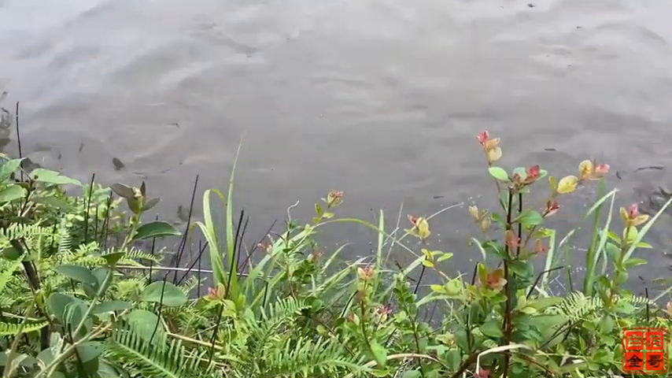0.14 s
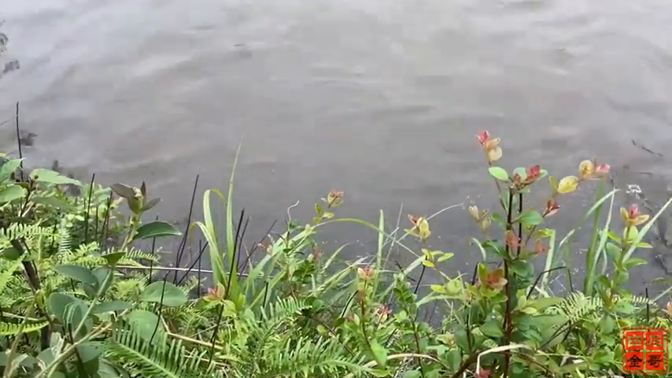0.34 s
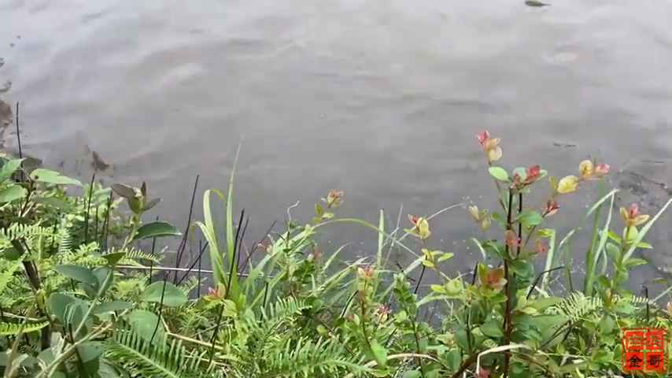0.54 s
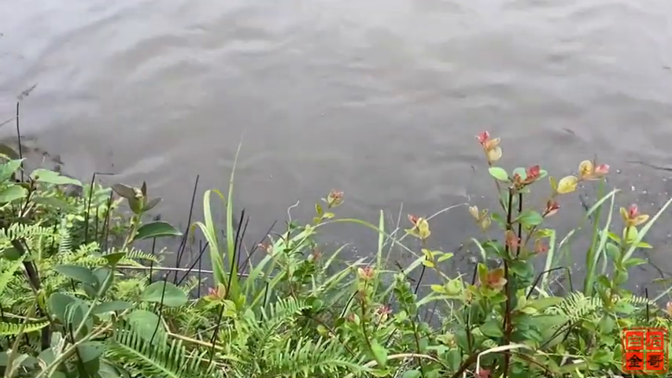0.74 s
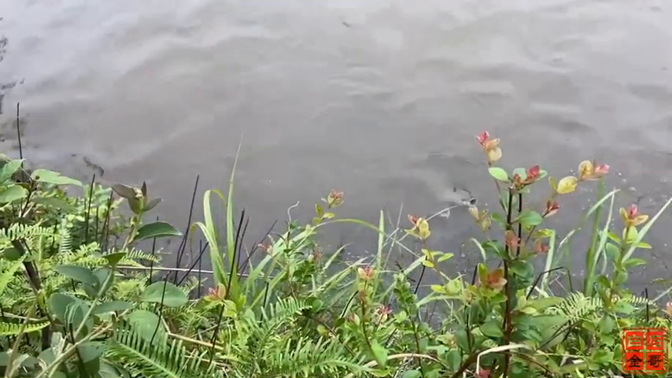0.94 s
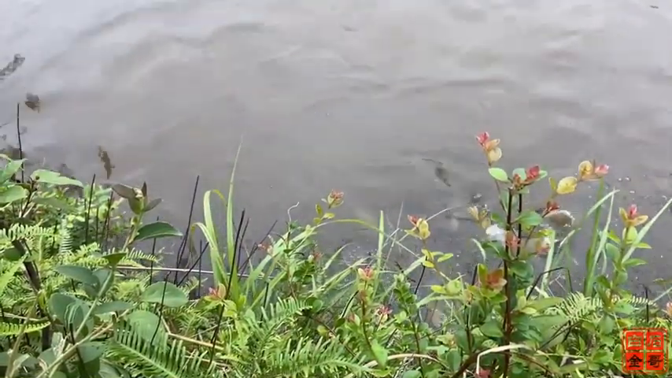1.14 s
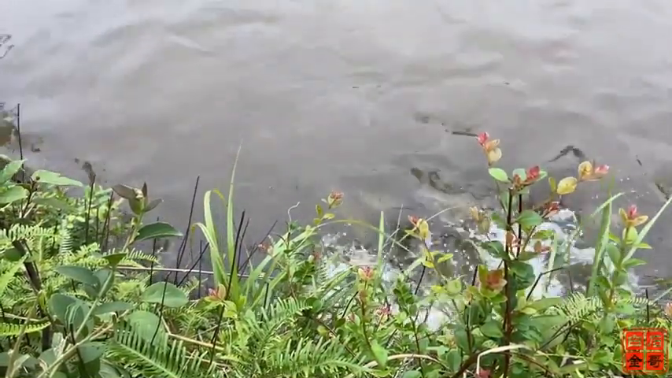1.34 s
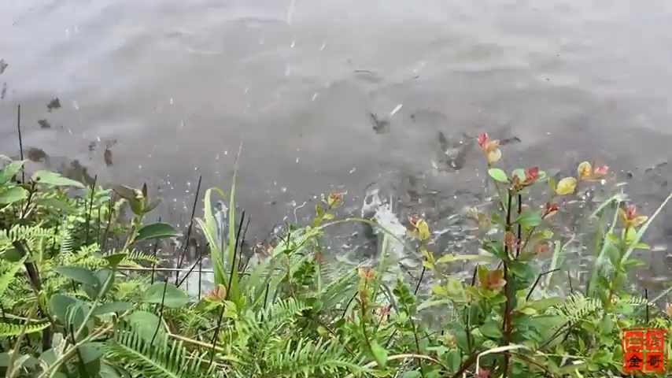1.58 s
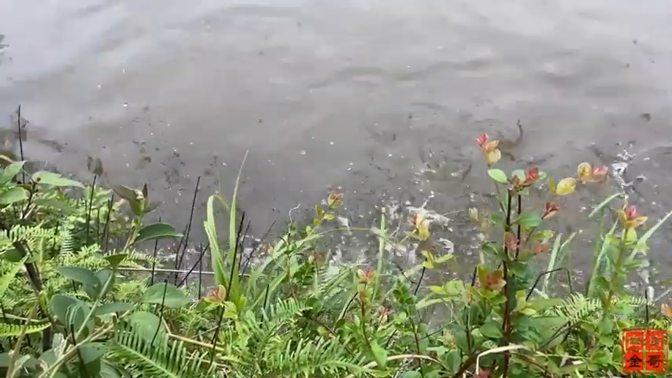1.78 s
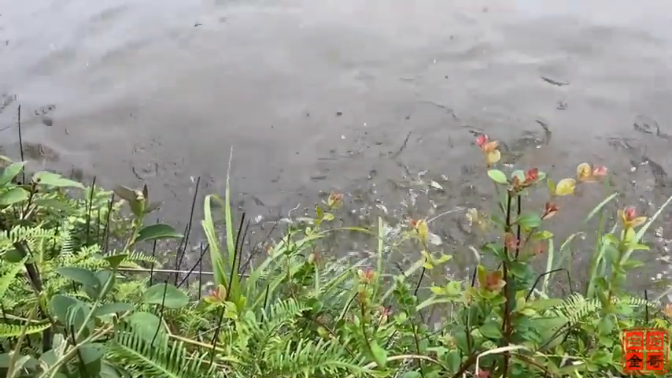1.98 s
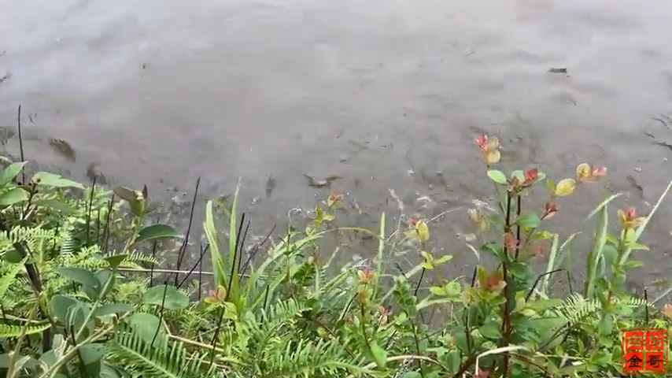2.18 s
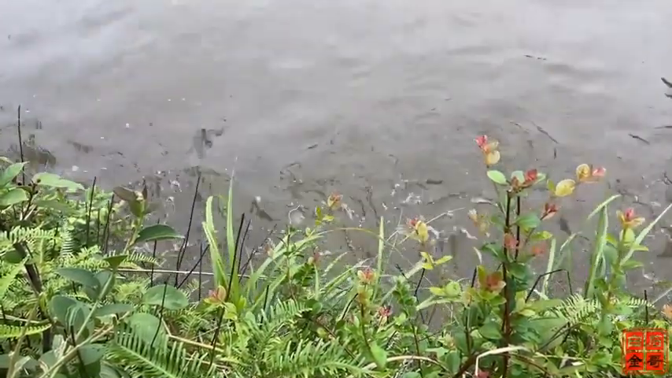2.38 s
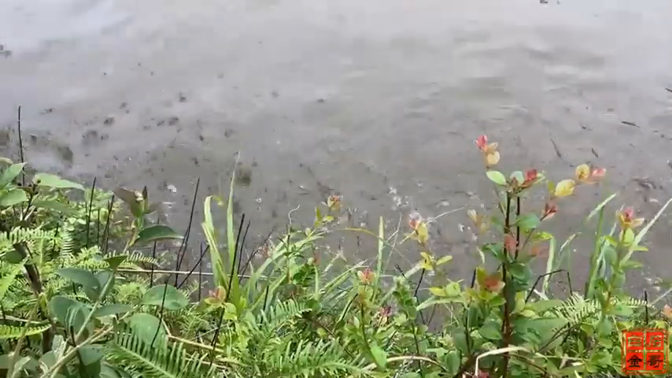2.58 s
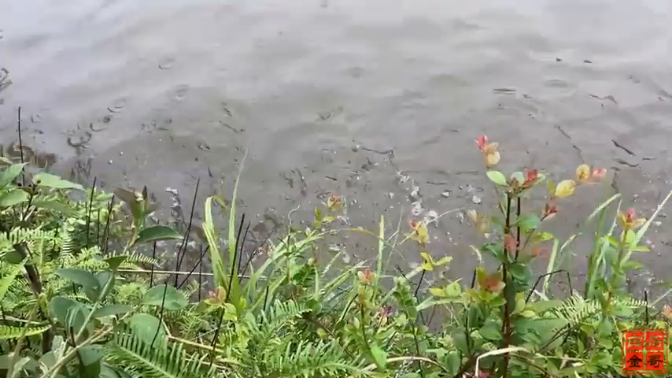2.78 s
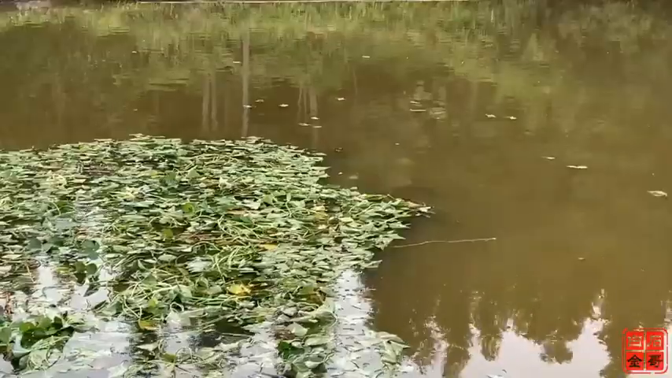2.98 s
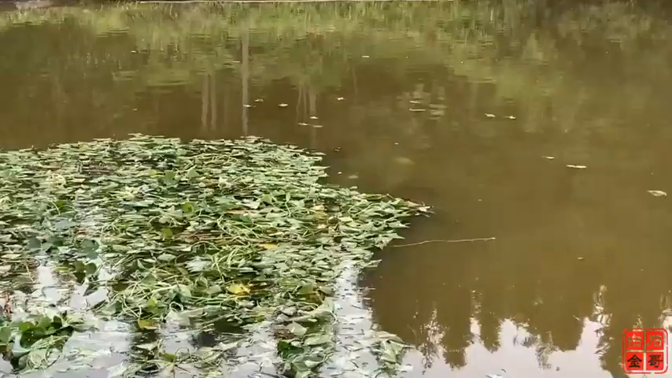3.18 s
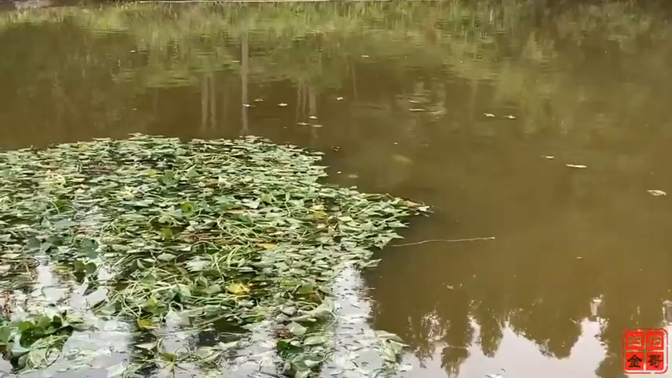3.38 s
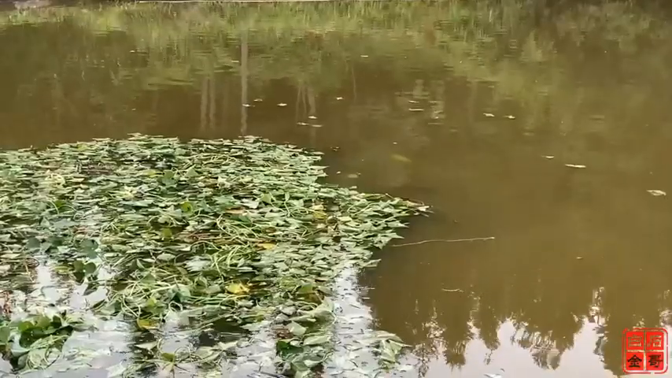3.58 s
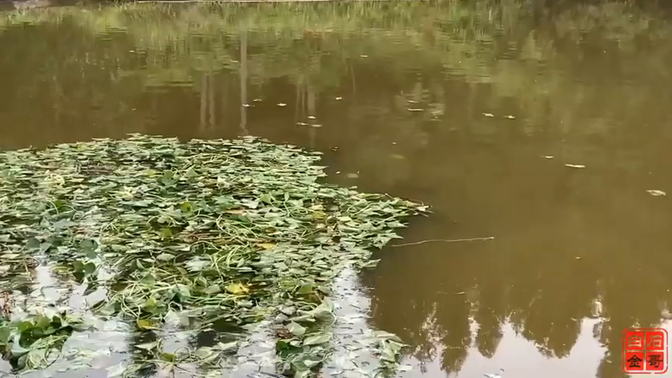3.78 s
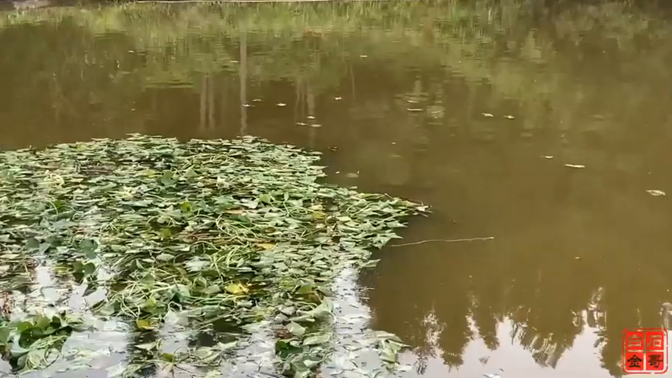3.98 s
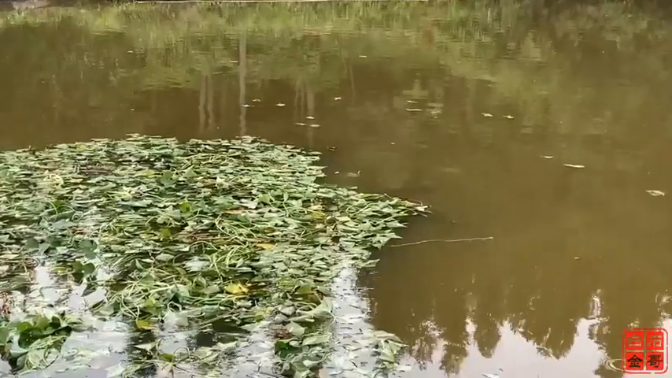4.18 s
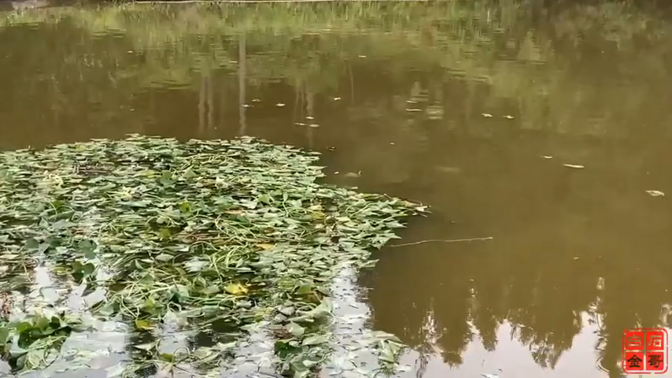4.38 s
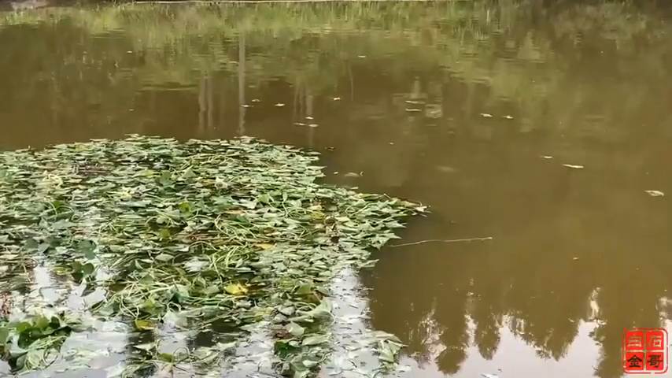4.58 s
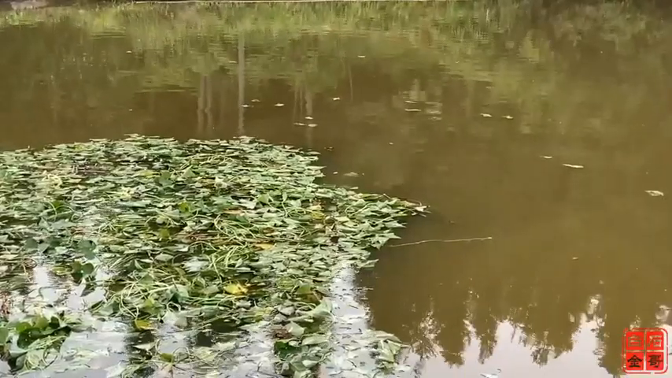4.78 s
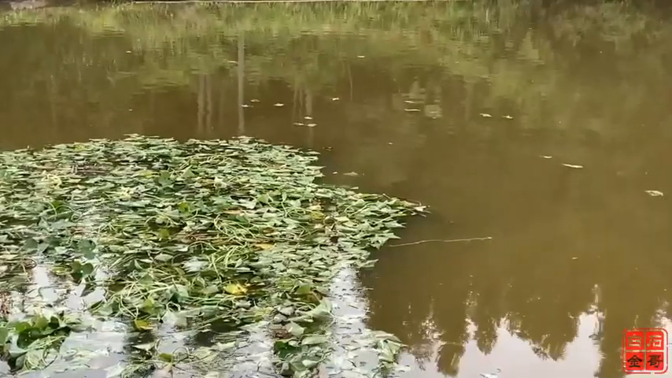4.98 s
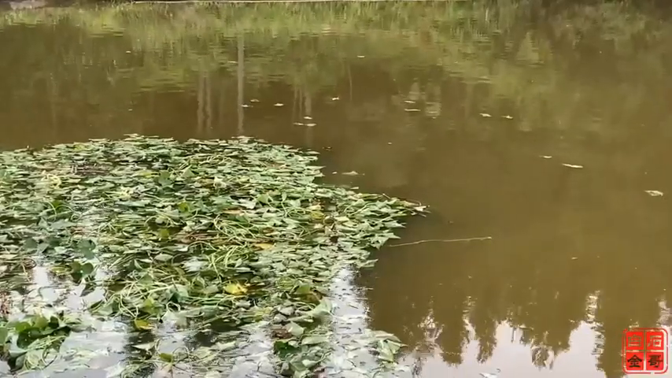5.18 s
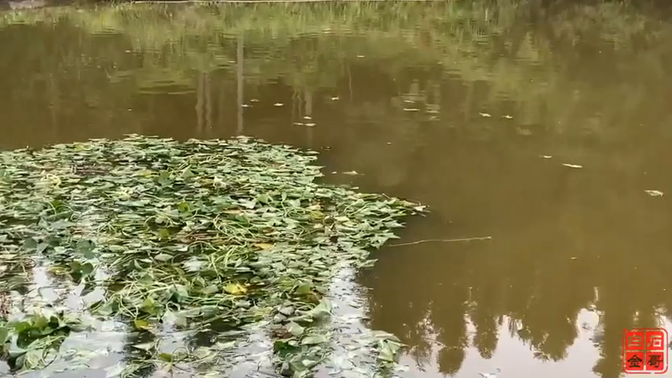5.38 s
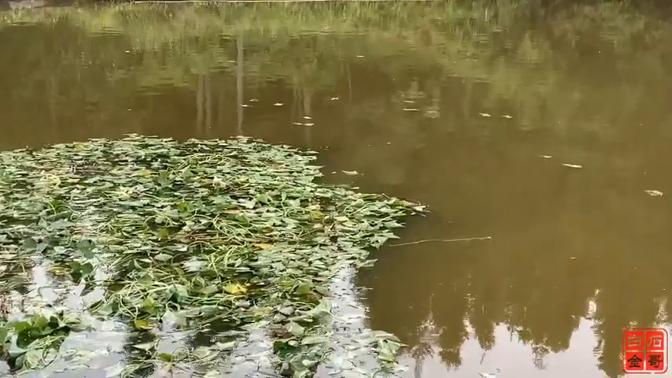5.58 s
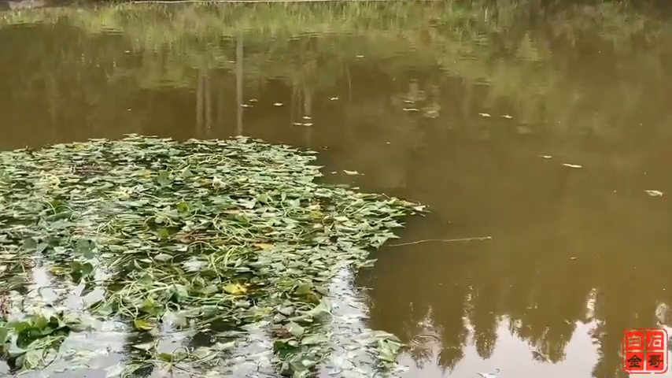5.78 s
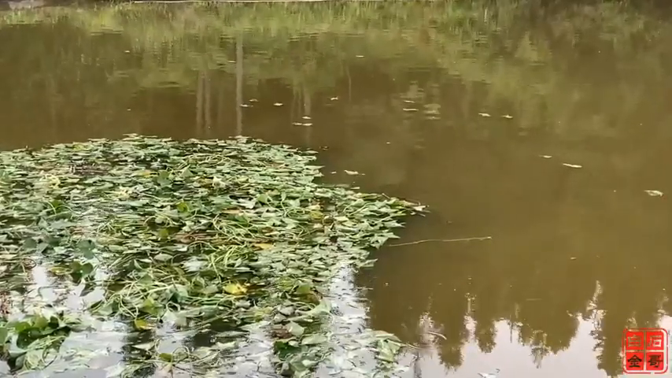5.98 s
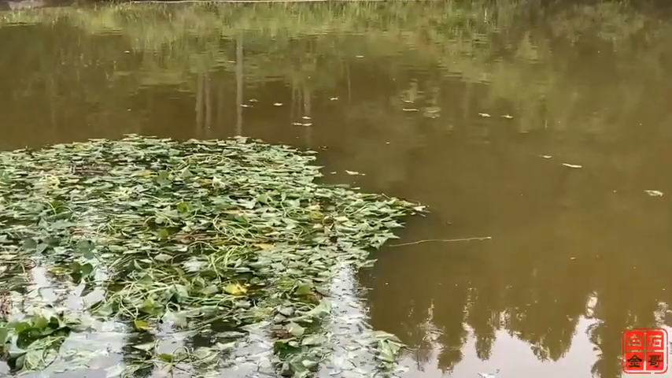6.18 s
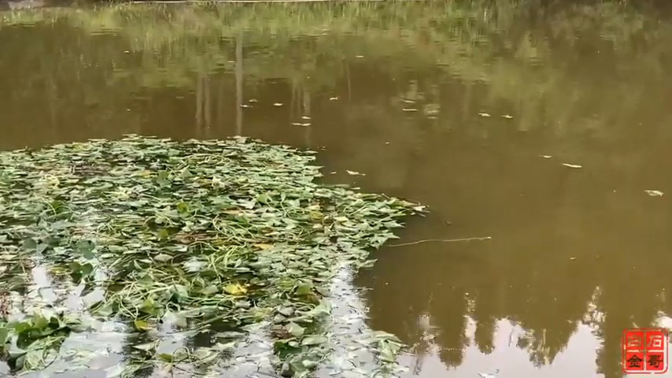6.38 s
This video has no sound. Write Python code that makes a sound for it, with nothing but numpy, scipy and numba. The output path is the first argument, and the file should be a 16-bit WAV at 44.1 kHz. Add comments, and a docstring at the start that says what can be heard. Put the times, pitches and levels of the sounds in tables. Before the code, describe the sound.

At a pond bank, feeding fish make soft plips, smacks and rising bloops for a second. Then the shoal bolts: a loud, dense thrash of gulping water, slaps and spray, slightly distorted on a close phone microphone. It settles into fine pattering drops by three seconds, a brief abrupt scrap of splash cuts in and out, and a very quiet pond remains with faint hiss, low rumble and tiny pops.

```python
"""At the edge of a pond, a fish feed heard by a phone on the bank. Mouths smack and small bubbles plop (gliding
damped sines), then the shoal bolts and thrashes: swarms of such bubbles over coloured noise, with noise cracks
for the slaps. Spray patters back as the water settles; a short snippet of splash is cut in, with abrupt edges.
Then the pond lies calm: a distant rumble, faint insects and steady hiss, all filtered noise, and a few tiny pops.
The phone overloads on the splash."""
import sys
import numpy as np
from scipy import signal
from scipy.fft import rfft, irfft, next_fast_len
from scipy.io import wavfile
from scipy.ndimage import uniform_filter1d
from numba import njit

SR = 44100
rng = np.random.default_rng(int(sys.argv[2]) if len(sys.argv) > 2 else 0)


def digitize_waveform(pressure):
    """Quantize a signal to 16-bit integers and store it at the path in sys.argv[1].

    Rows of a 2-D input are taken as channels; values are limited to [-1, 1].
    """
    field = np.atleast_2d(pressure).T
    bounded = np.clip(field, -1, 1)
    quanta = np.round(bounded * 32767).astype(np.int16)
    wavfile.write(sys.argv[1], SR, quanta)


N = 283563  # length in samples

# How hard the fish churn the water: they nibble, bolt, thrash and settle.
# Each row: time in seconds, effort in dB.
EFFORT = [(0, -42.5), (0.21, -47), (0.31, -38), (1.05, -35), (1.09, -16.5), (1.17, -18), (1.29, -8),
          (1.37, -12), (1.44, -9.5), (1.64, -12.5), (1.77, -13.5), (1.92, -21), (2.04, -19.5), (2.33, -25),
          (2.56, -34), (2.63, -38), (2.87, -48)]
# How thickly the bubbles crowd. Each row: time in seconds, density in dB (20 dB is tenfold) against full thrash.
CROWDING = [(0, -19), (1.0, -16), (1.25, 0), (1.8, -2), (2.4, -5), (2.8, -14), (2.9, -1)]
# Colour of the big air pockets. Each row: frequency in Hz, gain in dB.
SLOSH_COLOUR = [(30, -29), (70, -32.5), (120, -25), (190, -18.5), (240, -8), (300, -4.5), (450, 1),
                (650, 0), (1000, -1.5), (1300, -7), (1800, -26.5)]
# Colour of the small bubbles. Each row: frequency in Hz, gain in dB.
FIZZ_COLOUR = [(800, -26), (1300, 1), (1700, 0), (2700, -2.5), (3600, -1.5), (4400, -4.5), (5500, -27.5)]
# Colour of the spray. Each row: frequency in Hz, gain in dB.
SPRAY_COLOUR = [(3000, -30.5), (4600, 0.5), (5600, 1), (7500, -2), (10500, -5.5), (13000, -9)]
# Colour of the thump of heaved water. Each row: frequency in Hz, gain in dB.
HEAVE_COLOUR = [(30, -32), (65, -24), (95, -5.5), (140, -7), (190, 0.5), (225, -3.5), (275, -0.5),
                (350, -6.5), (500, -28)]
# Deep gulps of the cavities that tails tear open. Each row: start in seconds, starting pitch in Hz, level in dB.
GULPS = [(1.075, 478, 6.5), (1.107, 440, 2), (1.117, 660, 2.5), (1.142, 463, 0.5), (1.167, 975, 0),
         (1.186, 230, 5), (1.197, 560, 5), (1.273, 1100, 2.5), (1.308, 380, 1), (1.32, 1250, 3),
         (1.346, 760, 8), (1.434, 553, 4.5), (1.579, 506, 9.5), (1.687, 730, 4), (1.787, 394, 1.5),
         (1.847, 690, -4), (2.118, 476, 1.5), (2.3, 720, -6), (2.584, 900, -17)]
# Tail slaps and single drops that smack the surface. Each row: start in seconds, level in dB before colouring.
SMACKS = [(0.124, -37), (0.318, -19), (0.325, -15), (0.587, -22), (0.711, -21), (0.894, -17), (1.078, -8),
          (1.2, -1), (1.28, -5.5), (1.318, 6), (1.43, 2.5), (2.179, -8), (2.294, -10), (2.353, -19),
          (2.518, -16.5), (2.579, -19), (2.63, -18.5)]
# Short plips of snapping mouths and falling drops.
# Each row: start in seconds, starting pitch in Hz, level in dB, glide in octaves per second.
PLIPS = [(0.095, 830, -18.5, -56), (0.113, 510, -8.5, -74), (0.118, 2420, -9, 63), (0.149, 636, -9.5, -63),
         (0.174, 1690, -15.5, 29), (0.222, 540, -10, -48), (0.292, 2860, -12, 50), (0.372, 2990, -9, 70),
         (0.436, 670, -7.5, -38), (0.477, 1740, -10.5, 50), (0.495, 2230, -13, -59), (0.638, 616, -7, -20),
         (0.752, 2260, -14, -38), (0.753, 650, -10, -62), (0.856, 570, -8.5, 60), (0.886, 1650, -11, 0),
         (0.912, 3640, -11.5, -34), (0.995, 600, -15, 35), (1.019, 950, -13, -57), (1.032, 880, -5.5, 64),
         (2.404, 730, -9, 60), (2.472, 2500, -13, 9), (2.548, 980, -10.5, -63), (2.714, 1920, -16.5, -35.5),
         (2.819, 4300, -24, 64), (2.833, 1250, -26, 29)]
# Long bloops of bubbles that rise to the surface.
# Each row: start in seconds, starting pitch in Hz, level in dB, glide in octaves per second.
BLOOPS = [(0.249, 1590, -19, 10), (0.324, 892, -17.5, 20.5), (0.375, 394, -23.5, 10.5),
          (0.453, 1060, -25, 69), (0.514, 416, -28, 0), (0.593, 1726, -14.5, 28.5),
          (0.639, 1180, -19.5, 6.5), (0.722, 600, -27.5, 2.5), (0.816, 794, -17.5, 18),
          (0.897, 746, -22, 48), (0.918, 1484, -20, 8)]
# One soft plop on the calm pond. Each row: start in seconds, starting pitch in Hz, level in dB,
# 60 dB decay time in seconds, glide in octaves per second.
CALM_PLOP = [(5.815, 970, -35, 0.04, -150)]
# The clearest tiny pops out on the calm pond. Each row: start in seconds, level in dB, starting pitch in Hz.
POPS = [(3.2201, -32.5, 1820), (3.284, -31, 3520), (3.7053, -28.5, 2720), (3.8227, -28.5, 1690),
        (4.035, -34.5, 1490), (4.126, -28.5, 3550), (5.1404, -28, 3480), (5.2113, -35, 1720),
        (5.5857, -32.5, 1520), (5.6026, -32, 1500), (5.8338, -33.5, 1970), (6.3827, -35, 1475)]
# Insects in the grass. Each row: pitch in Hz, band width in Hz, level in dB, flutter rate per second,
# flutter depth in dB (typical spread).
INSECTS = [(6064, 560, -61, 55, 4), (8540, 114, -71.5, 55, 5.5), (9220, 240, -72.5, 35, 4)]
# Level of the distant rumble. Each row: time in seconds, level in dB.
RUMBLE_LEVEL = [(3.1, -48.5), (3.6, -44.5), (4.5, -49.5), (4.65, -45.5), (4.9, -45.5), (5.25, -51.5),
                (5.6, -46.5), (6.43, -48)]
# Colour of the rumble. Each row: frequency in Hz, gain in dB.
RUMBLE_COLOUR = [(30, -31), (62, -11), (76, -10), (100, -4), (130, 0), (165, 2.5), (220, -11), (255, -8),
                 (290, -4), (372, -17.5), (415, -14.5), (520, -25), (1000, -35.5), (2000, -48)]
# Colour of the steady hiss of the open air. Each row: frequency in Hz, gain in dB.
HISS_COLOUR = [(400, 3.5), (700, 0), (1100, -0.5), (1650, 2), (2150, -1.5), (3000, -2), (3500, 2),
               (4200, -2.5), (5500, -3.5), (6700, -4), (8300, -1), (9300, -4.5), (10500, -11),
               (13000, -15.5)]
# Width of the stereo image. Each row: frequency in Hz, gain of the side signal in dB.
WIDTH = [(60, -18.5), (150, -17.5), (400, -52), (2200, -52), (3300, -44), (4500, -8), (7000, 0),
         (13000, -3.5)]

# a short snippet of splash, cut in with abrupt edges
SNIPPET_START_S, SNIPPET_END_S = 2.902, 2.970
SNIPPET_DB = (-21, -23, -28.5)  # slosh, fizz, spray
# each layer follows the effort: level in dB at 0 dB effort, dB per dB of effort
SLOSH_LAW, FIZZ_LAW, SPRAY_LAW = (0, 0.97), (-1.3, 1.025), (-8, 1.018)
# the bolt throws up a sheet of extra spray
THROW_S, THROW_WIDTH_S, THROW_DB = 1.29, 0.07, 5
# after its time in the air the spray gradually starts to patter back
FLIGHT_S, FALL_WIDTH_S, FALL_DB = 0.95, 0.08, 4.5
GULP_T60_S, GULP_GLIDE_OCT_PER_S = 0.026, -37.5
STRAY_DROPS_PER_S, STRAY_DROP_DB, DROP_SPREAD_DB = 14, 1, 2.5  # levels relative to the effort
PLIP_T60_S = 0.01
BLOOP_CYCLES = 78  # cycles at the starting pitch until a bloop has died away
STRAY_BUBBLE_DB = -40  # ceiling for the stray bubbles
WAKE_DB, WAKE_T60_S = -24.5, 0.11  # stirring of the water relative to its bubble
HISS_DB = -52.5
TOP_HZ = 13080  # top of the phone's range


def stirred():
    """How hard the water moves, in dB: the shoal's effort plus the short wake of each plip or bloop."""
    t = np.arange(SR // 4) / SR
    power = undb(curve(EFFORT)) ** 2
    for start_s, _, db, _ in [*PLIPS, *BLOOPS]:
        start = int(start_s * SR)
        power[start:start + len(t)] += undb(db + WAKE_DB - 60 * t / WAKE_T60_S) ** 2
    return 10 * np.log10(power)


def churn_levels(effort_db):
    """Slosh, fizz and spray levels in dB: they follow the effort, then hold steady from the snippet on."""
    t = np.arange(N) / SR
    slosh_db, fizz_db, spray_db = (
        base_db + slope * effort_db for base_db, slope in (SLOSH_LAW, FIZZ_LAW, SPRAY_LAW))
    thrown_db = THROW_DB * np.exp(-((t - THROW_S) / THROW_WIDTH_S) ** 2)
    falling_db = FALL_DB * (1 + np.tanh((t - THROW_S - FLIGHT_S) / FALL_WIDTH_S)) / 2
    levels = slosh_db, fizz_db, spray_db + thrown_db + falling_db
    return [np.where(t >= SNIPPET_START_S, snippet_db, db) for snippet_db, db in zip(SNIPPET_DB, levels)]


def churn(effort_db):
    """Thrashing fish trap big air pockets, shed small bubbles and throw spray that ticks on the surface."""
    slosh_db, fizz_db, spray_db = churn_levels(effort_db)
    crowd_db = curve(CROWDING)
    pockets = swarm(crowd_db, 198.3, 1530, rate=1000, cycles=29.4, scatter_db=2, rise=0.27)
    small = swarm(crowd_db, 1121, 4930, rate=4000, cycles=35.0, scatter_db=3, rise=0.46)
    drops = swarm(crowd_db, 3390, 12470, rate=5000, cycles=23.0, scatter_db=1.0, rise=0.36)
    # water breaks up in quick spurts and slower strokes
    spurt_db = 1.64 * walk(140)
    stroke_db = 1.0 * walk(27.96)
    slosh = shaped(pockets, SLOSH_COLOUR, wash_db=5.5) * undb(slosh_db + stroke_db + 0.5 * spurt_db)
    fizz = shaped(small, FIZZ_COLOUR, wash_db=1.5) * undb(fizz_db + stroke_db + 0.8 * spurt_db)
    spray = shaped(drops, SPRAY_COLOUR, wash_db=2.5) * undb(spray_db + stroke_db + spurt_db)
    # the thump grows faster than the slosh, so it tells mainly on the hardest tail strokes
    heave = unit(colour(rng.standard_normal((2, N)), HEAVE_COLOUR))
    thump = heave * undb(1.266 * slosh_db - 9.0)
    before_end = np.arange(N) / SR < SNIPPET_END_S
    return (slosh + fizz + spray + thump) * before_end


def gulps():
    """Big cavities whose pitch falls as they grow, and which close quickly."""
    start_s, hz, db = np.transpose(GULPS)
    return bubbles(start_s, hz, db, GULP_T60_S, GULP_GLIDE_OCT_PER_S, wet_db=-23.5)


def smacks(effort_db, t60):
    """Slaps and drops crack the surface for milliseconds; stray drops fall at random, as hard as the fish churn."""
    t = np.arange(SR // 25) / SR
    when, strength = rng.random((int(STRAY_DROPS_PER_S * SNIPPET_START_S), 2)).T
    stray_s = when * SNIPPET_START_S
    effort_then_db = effort_db[(stray_s * SR).astype(int)]
    stray_db = effort_then_db + STRAY_DROP_DB + DROP_SPREAD_DB * (2 * strength - 1)
    out = np.zeros((2, N))
    for start_s, db in [*SMACKS, *zip(stray_s, stray_db)]:
        crack = rng.standard_normal((2, len(t))) * undb(-60 * t / t60) * [[1], [0.5]]
        start = int(start_s * SR)
        out[:, start:start + len(t)] += undb(db) * crack
    return colour(out, [(1500, 4.5), (4500, 0.5), (7000, -1.0), (13000, -9.5)])


def plips():
    """Snapping mouths and falling drops make tiny bubbles that are gone in a moment."""
    start_s, hz, db, glide = np.transpose(PLIPS)
    return bubbles(start_s, hz, db, PLIP_T60_S, glide, wet_db=-13.5)


def bloops():
    """Rising bubbles die away in time inverse to their starting pitch, so the big ones last longest."""
    start_s, hz, db, glide = np.transpose(BLOOPS)
    return bubbles(start_s, hz, db, BLOOP_CYCLES / hz, glide, wet_db=-11)


def strays(effort_db):
    """Faint rising bubbles here and there until the snippet, fainter still when the fish are quiet."""
    gurgle = swarm(np.zeros(N), 416.6, 2640, rate=55, cycles=55, scatter_db=1.5, rise=0.6)
    before_snippet = np.arange(N) / SR < SNIPPET_START_S
    return gurgle * undb(np.minimum(effort_db, STRAY_BUBBLE_DB)) * before_snippet


def pops():
    """Far little pops: a bubble rings for a moment, blurred by the trees around the pond."""
    start_s, db, hz = np.array(POPS, float).T.copy()
    centred = np.zeros(len(hz))
    clear = ring(start_s, hz, undb(db), 18 / hz, np.full(len(hz), 15.), centred, 0.8)
    faint = swarm(np.zeros(N), 1375, 3900, rate=69, cycles=19.4, scatter_db=2.5, rise=0.23) * undb(-59.5)
    return clear + faint + scatter(clear + faint, t60=0.075)


def insects():
    """Each shrills as noise in a narrow band and flutters quickly and unevenly."""
    out = 0
    for hz, width_hz, db, flutter_rate, flutter_db in INSECTS:
        far, near = 1.5 * width_hz, width_hz / 2
        band = [(hz - far, -30), (hz - near, -3), (hz, 0), (hz + near, -3), (hz + far, -30)]
        shrill = unit(colour(rng.standard_normal((2, N)), band))
        out = out + shrill * undb(db + flutter_db * walk(flutter_rate))
    return out * [[1], [0.65]]


def open_air():
    """Filtered noise: a distant low rumble that swells slowly, under a thin steady hiss."""
    rumble = unit(colour(rng.standard_normal(N), RUMBLE_COLOUR))
    rumble = rumble * undb(curve(RUMBLE_LEVEL) + 0.63 * walk(4.2))
    hiss = unit(colour(rng.standard_normal((2, N)), HISS_COLOUR)) * undb(HISS_DB + 0.65 * walk(9.1))
    return rumble * [[1], [0]] + hiss * [[1], [0.65]]


def bubbles(start_s, hz, db, t60, glide, wet_db):
    """Single plops, each followed by a short scatter off the bank and its plants."""
    rows = np.broadcast_arrays(start_s, hz, db, t60, glide)
    start_s, hz, db, t60, glide = np.array(rows, float)
    pan = rng.uniform(-0.58, 0.5, len(start_s))
    plops = ring(start_s, hz, undb(db), t60, glide, pan, 0.72)
    return plops + undb(wet_db) * scatter(plops, t60=0.093)


def scatter(x, t60):
    """Many weak reflections that die away quickly, heard as noise convolved with the mid signal."""
    t = np.arange(SR // 4) / SR
    tail = rng.standard_normal((2, len(t))) * undb(-60 * t / t60) * (1 - np.exp(-t / 0.0049))
    tail /= np.sqrt(np.sum(tail[0] ** 2))
    return signal.fftconvolve(x[:1], tail, axes=1)[:, :N]


def swarm(crowd_db, low_hz, high_hz, rate, cycles, scatter_db, rise):
    """Random bubbles of about unit rms, rate a second at full crowding."""
    density = rate * undb(crowd_db)
    expected = np.cumsum(density) / SR
    place, pitch, loud, life, lift, side = rng.random((int(expected[-1]), 6)).T
    at = np.searchsorted(expected, place * expected[-1])
    hz = low_hz * (high_hz / low_hz) ** pitch
    t60 = cycles * 2 ** (2 * life - 1) / hz
    size = unit(undb(-scatter_db * np.log(1 - 0.98 * loud)))
    # dense or long bubbles overlap more, so each is made smaller
    size = 2 * np.sqrt(np.log(1000) / (t60 * density[at])) * size
    # a bubble's pitch rises as it nears the surface
    glide = 2 * rise * lift / t60
    return ring(at / SR, hz, size, t60, glide, 2 * side - 1, 0.37)


@njit
def ring(start_s, hz, size, t60, glide, pan, swell_cycles):
    """Bubbles as damped, gliding sines that swell within a cycle or so; returns mid and side."""
    out = np.zeros((2, N))
    for k in range(len(start_s)):
        start = int(start_s[k] * SR)
        phase, fade, gap, f = 0., size[k], 1., hz[k]
        decay = np.exp(-6.91 / (t60[k] * SR))
        swell = np.exp(-f / (swell_cycles * SR))
        bend = 2 ** (glide[k] / SR)
        for i in range(max(start, 0), min(start + int(t60[k] * SR), N)):
            v = fade * (1 - gap) * np.sin(phase)
            out[0, i] += v
            out[1, i] += v * pan[k]
            phase += 2 * np.pi * f / SR
            fade, gap = fade * decay, gap * swell
            # the glide stops at 2.6 times above or below the starting pitch
            f = min(max(f * bend, hz[k] / 2.6), hz[k] * 2.6, 0.45 * SR)
    return out


def shaped(grains, points, wash_db):
    """Grains over a wash of unresolved droplets, in a given colour and with the mid at rms 1."""
    # equal energy per octave becomes equal energy per hertz
    flat = colour(grains, [(30, -27), (15360, 0)])
    wash_gain = undb(wash_db)
    wash = wash_gain * rng.standard_normal((2, N)) * [[1], [0.6]]
    mix = (flat / np.std(flat[0]) + wash) / np.hypot(1, wash_gain)
    water = colour(mix, points)
    return water / np.std(water[0])


def colour(x, points):
    """Causal minimum-phase filter through (Hz, dB) points, falling 10 dB per octave beyond both ends."""
    size = next_fast_len(N + 8192, real=True)
    hz, db = np.transpose(points)
    octave = np.log2(np.maximum(np.fft.rfftfreq(size, 1 / SR), 1))
    beyond = np.abs(octave - np.clip(octave, np.log2(hz[0]), np.log2(hz[-1])))
    gain_db = np.interp(octave, np.log2(hz), db) - 10 * beyond
    # folding the cepstrum forward in time makes the filter causal
    cepstrum = irfft(np.log(undb(gain_db)), size)
    cepstrum[1:size // 2] *= 2
    cepstrum[size // 2 + 1:] = 0
    return irfft(rfft(x, size) * np.exp(rfft(cepstrum)), size)[..., :N]


def walk(rate):
    """Random levels held 1 / rate s and slewed twice; spread near 1."""
    k = int(SR / rate)
    held = np.repeat(rng.standard_normal(N // k + 1), k)
    return 1.3 * uniform_filter1d(uniform_filter1d(held, k), k)[:N]


def curve(table):
    """Rows of (seconds, value) joined by straight lines."""
    s, value = np.transpose(table)
    return np.interp(np.arange(N) / SR, s, value)


def undb(db):
    """Decibels to gain."""
    return 10 ** (np.asarray(db) / 20)


def unit(x):
    """Scale to rms 1."""
    return x / np.sqrt(np.mean(x ** 2))


def scene():
    """All sources to left and right; the treble spreads wide, the middle range stays central."""
    effort_db = stirred()
    water = churn(effort_db) + gulps() + smacks(effort_db, t60=0.01)
    feeding = water + plips() + bloops() + strays(effort_db)
    calm = bubbles(*np.transpose(CALM_PLOP), wet_db=-8) + pops() + insects() + open_air()
    mid, side = feeding + calm
    side = colour(side, WIDTH)
    return np.array([mid + side, mid - side])


def record(dry):
    """The phone on the bank flattens the highest peaks of the splash and cuts the top."""
    clipped = dry / (1 + np.abs(dry / 0.97) ** 8) ** (1 / 8)
    top_cut = signal.ellip(10, 0.2, 70, TOP_HZ, fs=SR, output="sos")
    return signal.sosfilt(top_cut, clipped)


dry = scene()
out = record(dry)
digitize_waveform(out)
```